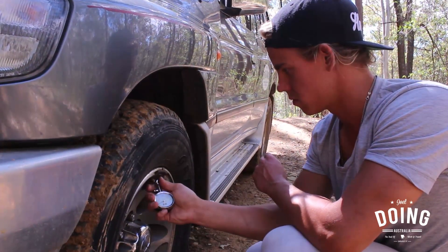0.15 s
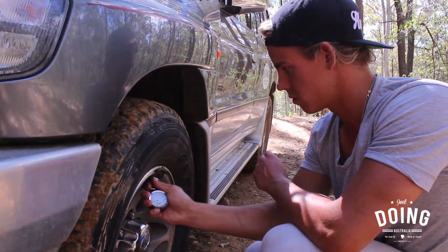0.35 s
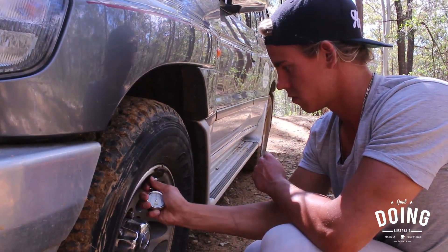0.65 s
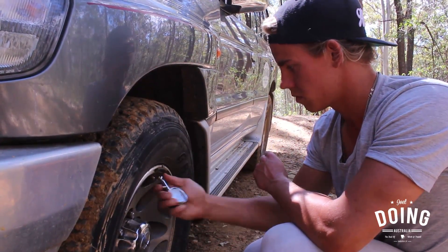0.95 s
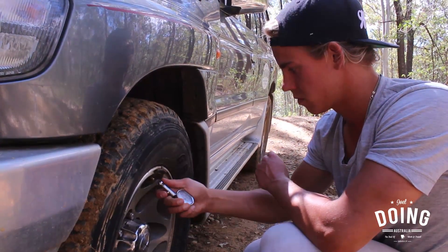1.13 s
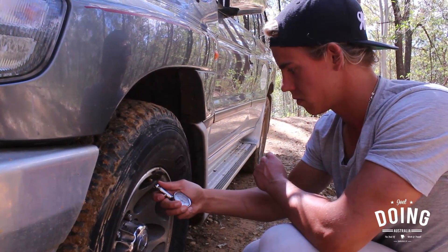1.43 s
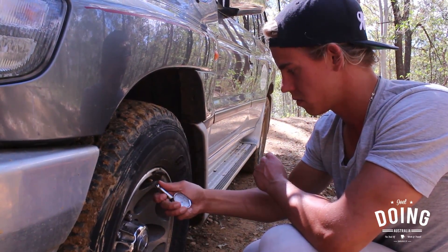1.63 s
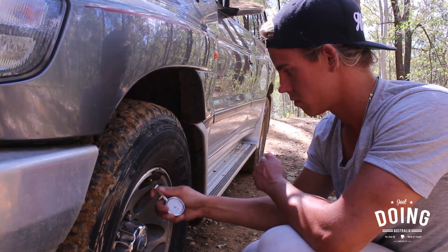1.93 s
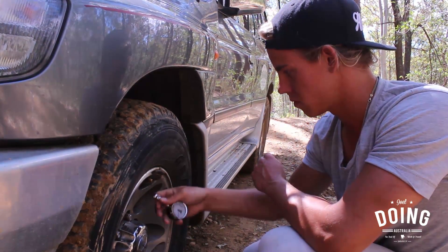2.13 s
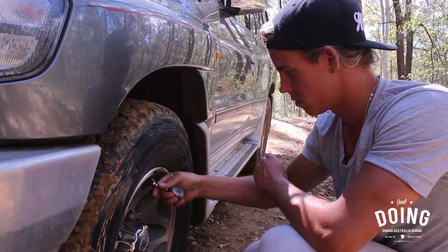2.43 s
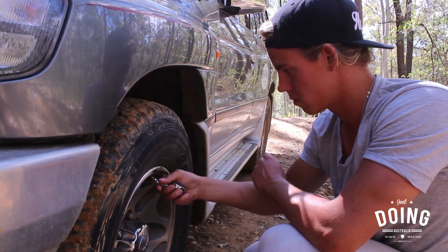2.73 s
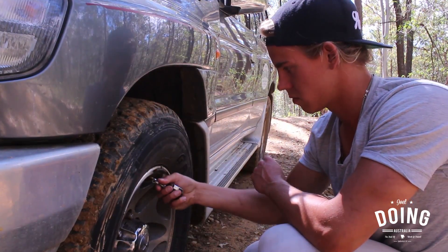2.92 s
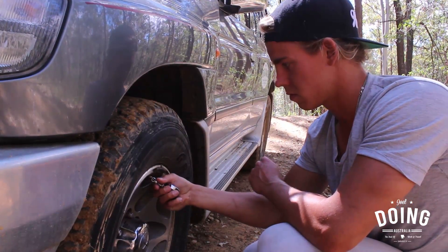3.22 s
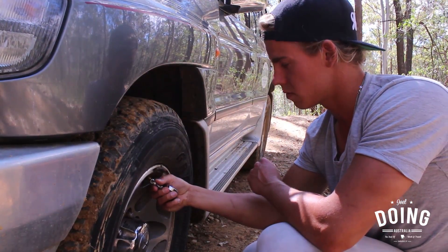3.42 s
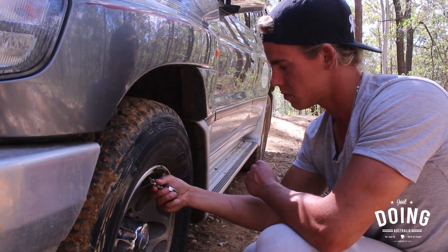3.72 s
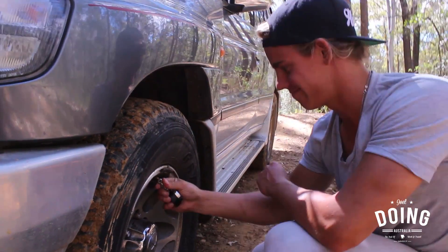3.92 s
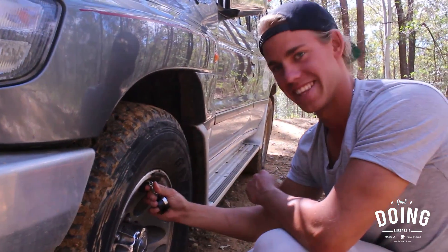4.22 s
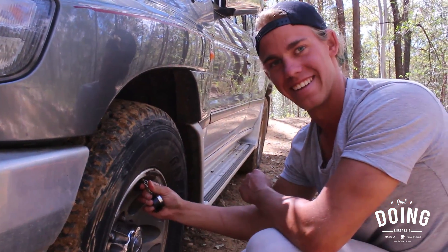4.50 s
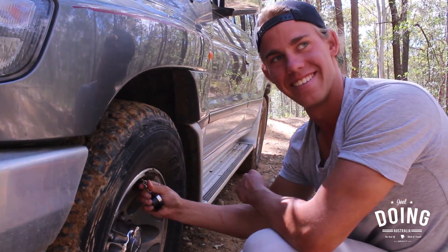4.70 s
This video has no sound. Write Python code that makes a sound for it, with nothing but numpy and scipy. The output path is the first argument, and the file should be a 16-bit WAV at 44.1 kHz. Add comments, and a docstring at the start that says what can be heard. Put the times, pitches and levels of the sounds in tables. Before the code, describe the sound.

Outdoors, very quiet at first: light clusters of metallic clicks, dull little knocks and a couple of brief air spurts from a tyre valve, with thin far bird whistles. Shortly before three seconds the valve opens and air hisses strongly and continuously to the end, with one sudden break and quick fade back in a changed tone. Close, dry, centred sound with faint background hiss.

```python
"""Outdoors in a quiet wood, a tyre valve close to the microphone, a light breeze over it throughout.
First a small pressure gauge ticks and fumbles against the valve (gritty contacts ringing its modes), with
dull low knocks and short puffs of escaping air (swelling noise); far birds call (gliding sines).
Then the pin is held down and the jet hisses: noise blown through resonances of gauge and wheel.
Late on the sound breaks off and fades back in, and the hiss has another colour."""
import sys
import numpy as np
from scipy import signal
from scipy.fft import rfft, irfft
from scipy.io import wavfile
from scipy.ndimage import map_coordinates

SR = 44100
rng = np.random.default_rng(int(sys.argv[2]) if len(sys.argv) > 2 else 0)


def put_to_file(sound):
    """Save the sound as 16-bit audio at rate SR, in the file named by the first command-line argument."""
    columns = np.atleast_2d(sound).T  # one column per channel
    safe = np.clip(columns, -1, 1)
    whole_steps = np.round(safe * 32767)
    wavfile.write(sys.argv[1], SR, whole_steps.astype(np.int16))


def invert_db(level):
    """Linear amplitude ratio for a level in decibels (20 dB per decade), elementwise."""
    return 10 ** (np.asarray(level, dtype=float) / 20)


N = 214087   # samples


def rms_one(x):
    """Scale to rms 1."""
    return x / np.sqrt(np.mean(x ** 2) + 1e-30)


def in_time(rows):
    """Columns of a table at every sample, straight lines between its times."""
    s, *columns = np.transpose(rows)
    return [np.interp(np.arange(N) / SR, s, c) for c in columns]


def coloured(spectrum, white):
    """Filter noise by a curve of gains in dB, drawn over log frequency."""
    hz, db = np.transpose(spectrum)
    grid_hz = np.arange(N // 2 + 1) * SR / N + 1   # 1 Hz up, so that the log exists
    gain_db = np.interp(np.log(grid_hz), np.log(hz), db)
    return irfft(rfft(white) * invert_db(gain_db), N)


def drift(rate_hz):
    """Slow chance of spread 1: noise through two equal low-pass poles, drawn at every 40th sample."""
    r = np.exp(-80 * np.pi * rate_hz / SR)
    white = rng.standard_normal(N // 40 + 2002)
    slow = signal.lfilter([1], [1, -2 * r, r * r], white)[2000:]   # leave out the settling
    return np.interp(np.arange(N) / 40, np.arange(len(slow)), rms_one(slow))


def ramp(start_s, rise_s):
    """0 before the start, rising straight to 1."""
    return np.clip((np.arange(N) / SR - start_s) / max(rise_s, 1 / SR), 0, 1)


def resonance(x, hz, width_hz):
    """Two-pole peak passed twice for steep flanks, gain 1 on top."""
    r = np.exp(-np.pi * width_hz / np.sqrt(np.sqrt(2) - 1) / SR)
    peak = [(1 - r * r) / 2, 0, (r * r - 1) / 2, 1, -2 * r * np.cos(2 * np.pi * hz / SR), r * r]
    return signal.sosfilt([peak, peak], x)


def ring(x, hz, t60_s):
    """A unit click sets a dying sine of starting height 1 ringing."""
    r = invert_db(-60 / (t60_s * SR))
    w = 2 * np.pi * hz / SR
    return signal.lfilter([0, np.sin(w)], [1, -2 * r * np.cos(w), r * r], x + 1e-18)


def breeze(lumps_db=1.0):
    """Low lumpy noise of air over the microphone."""
    # strength of the breeze: start_s, rms_db
    strength = [(0, -64.5), (.6, -67), (1.3, -69), (2.2, -74), (2.72, -65.5), (2.88, -72.5), (3.05, -63.5),
                (3.6, -72), (4.1, -62), (4.3, -63), (4.45, -70.5), (4.86, -69.5)]
    # its spectrum: pitch_hz, level_db (per Hz)
    breeze_colour = [(8.8, -36), (15, 3.5), (55, 2), (225, -18.5), (300, -17.5), (390, -55), (660, -120)]
    noise = rms_one(coloured(breeze_colour, rng.standard_normal(N)))
    return invert_db(in_time(strength)[0] + lumps_db * drift(10.5)) * noise


def wood(level_db=-72.5, sway_db=0.45):
    """Far rustle and murmur of the trees: steady coloured noise that sways a little."""
    # spectrum of the far trees: pitch_hz, level_db (per Hz)
    murmur = [(60, -16.5), (100, 0), (160, -3.5), (224, -6.5), (600, -8.5), (1450, -13), (2430, -22),
              (8000, -31), (16000, -62)]
    return invert_db(level_db + sway_db * drift(2.1)) * rms_one(coloured(murmur, rng.standard_normal(N)))


def touches(count=7, spread_db=6.5, faint_treble_db=-21):
    """The ticks, and a few faint touches scattered at random over each fumble."""
    # gauge against valve: start_s, level_db, treble_db (per octave)
    clear = [(0.1363, -42.5, -4), (0.194, -57, -5), (0.2067, -52, -1), (0.2242, -45.5, -10),
             (0.261, -52, -14), (0.277, -40.5, -17), (0.2849, -43, 3.5), (0.295, -49, -10),
             (0.867, -33.5, 15.5), (0.8997, -40.5, 4), (0.917, -39, -1), (0.923, -44, -3),
             (0.9336, -41, -3), (0.939, -44, 4), (1.6283, -52, 16), (2.135, -63, -7), (2.485, -39, -3),
             (2.8878, -35, -4)]
    # fumbling between the ticks: start_s, length_s, level_db (of the strongest touch possible)
    fumbles = [(0.184, 0.028, -60), (0.273, 0.038, -50), (0.916, 0.028, -51.5)]
    faint = []
    for s, length_s, db in fumbles:
        for when, less in rng.random((count, 2)):
            faint.append((s + length_s * when, db - 2 * spread_db * less, faint_treble_db))
    return np.transpose(clear + faint)


def ticks(contact_s=0.003, spread_db=2.5, crack_db=-16):
    """A short gritty contact cracks and rings every mode by chance strengths; some touches ring brighter."""
    # modes of the gauge: pitch_hz, level_db, t60_s
    modes = [(1545, -18, 0.055), (2040, -15.5, 0.017), (3100, -2, 0.01), (3490, 0.5, 0.0063),
             (3750, -2, 0.01), (3950, -7, .014), (5180, -6, 0.011), (6210, -5.5, 0.007),
             (7600, -11, 0.0027), (9720, -11, 0.0047)]
    s, db, treble_db = touches()   # each touch has its own treble tilt
    at = np.round(s * SR).astype(int)
    contact = np.exp(-np.arange(900) / (contact_s * SR))
    luck = rng.standard_normal((len(at), len(modes)))

    def gritty(level_db):
        """Noise that dies away after each touch."""
        blows = np.zeros(N)
        blows[at] = invert_db(level_db)
        return signal.fftconvolve(blows, contact)[:N] * rng.standard_normal(N)

    out = resonance(gritty(db + crack_db + treble_db), 7300, 6800)
    for k, (hz, mode_db, t60_s) in enumerate(modes):
        octaves = np.log2(max(hz, 3500) / 3500)   # the treble tilt starts at 3500 Hz
        mode_level_db = db + mode_db - 24.5 + treble_db * octaves + spread_db * luck[:, k]
        out += ring(gritty(mode_level_db), hz, t60_s)
    return out


def wheel_arch(x, sway_s=.000025):
    """Close echoes comb the sound; the comb slides as the hand moves."""
    # echoes off wing, sill and ground: delay_s, level_db
    echoes = [(.00085, -21.5), (.0023, -24), (.0061, -20), (0.0125, -18)]
    n = np.arange(N)
    out = x
    for delay_s, db in echoes:
        place = n - SR * (delay_s + sway_s * drift(0.97))
        out = out + invert_db(db) * map_coordinates(x, [place], order=3)
    return out


def trees(x, t60_s):
    """Scattering among the trunks: a smooth dying tail of noise, one second long."""
    tail = rng.standard_normal(SR) * invert_db(-60 * np.arange(SR) / SR / t60_s)
    return signal.fftconvolve(x, tail / np.sqrt(np.sum(tail ** 2)))[:N]


def bumps(cycles=5.0):
    """Soft low knocks: a rounded push that rings a few cycles."""
    # dull knocks: start_s, level_db, pitch_hz
    knocks = [(.137, -60, 334), (0.298, -60, 318), (0.668, -56, 89), (2.888, -55.5, 525),
              (4.146, -52.5, 120), (4.167, -50, 69)]
    out = 0
    for s, db, hz in knocks:
        click = np.zeros(N)
        click[round(s * SR)] = -invert_db(db)
        push = ring(click, hz, 3 / hz) * hz / SR * 12
        out = out + ring(push, hz, cycles / hz)
    return out


def puffs(hold_share=0.77):
    """Each leak swells, holds for a share of its rise, then dies; a tight gap sounds brighter."""
    # short leaks: open_s (fully open), rms_db, rise_s, t60_s, brightness (0-1)
    short_leaks = [(0.441, -41.5, 0.027, 0.067, 0.2), (.8665, -34, 0.0074, 0.045, 0.03),
                   (0.93, -64, 0.016, 0.025, 0.3), (1.61, -51.5, 0.0054, 0.073, 1),
                   (1.628, -54, .0015, 0.014, 0.95), (1.64, -69, .012, .08, 0.1)]
    # spectra of a dull and a bright leak: pitch_hz, level_db (per Hz)
    dull_colour = [(300, -26), (1270, -17), (1570, -10), (2150, -14.5), (2950, 0.5), (4240, 3), (5910, -3),
                   (7330, -30), (9000, -4), (10300, -20), (14000, -27), (15800, -17)]
    bright_colour = [(300, -11), (3600, -10), (5500, -3.5), (9000, -7), (13000, -2.5), (15800, -7)]
    t, out = np.arange(N) / SR, 0
    dull = rms_one(coloured(dull_colour, rng.standard_normal(N)))
    bright = rms_one(coloured(bright_colour, rng.standard_normal(N)))
    for s, db, rise_s, t60_s, share in short_leaks:
        dying_s = np.maximum(t - s - hold_share * rise_s, 0)
        shape = ramp(s - rise_s, rise_s) ** 2 * invert_db(db - 60 * dying_s / t60_s)
        share = np.clip(share, 0, 1)
        out = out + shape * (np.sqrt(1 - share) * dull + np.sqrt(share) * bright)
    return out


def birds(waver_db=5.5, glide_s=.028, edge_s=.012, fade_db_per_s=18):
    """Far birds: near sines that glide to a settled pitch, fade and flutter on the way."""
    # notes of a low whistler and a high chirper:
    # start_s, length_s, first_hz, settled_hz, rms_db (before fading), hoarseness (share of pitch)
    notes = [(.625, .25, 2370, 2308, -74, .003), (2.108, .024, 2520, 2510, -78, .004),
             (2.135, .33, 2330, 2305, -80.5, .003), (.818, .2, 7300, 5050, -82.5, .012),
             (2.352, .14, 7200, 5130, -81, .011)]
    t, out = np.arange(N) / SR, 0
    for s, length_s, first_hz, settled_hz, db, hoarse in notes:
        age_s = np.maximum(t - s, 0)
        glide_hz = settled_hz + (first_hz - settled_hz) * np.exp(-age_s / glide_s)
        hz = glide_hz * (1 + hoarse * drift(120))
        shape = ramp(s, edge_s) * (1 - ramp(s + length_s - edge_s, edge_s))
        flutter_db = waver_db * np.tanh(1.5 * drift(70))
        gain = shape * invert_db(db - fade_db_per_s * age_s + flutter_db)
        out = out + np.sqrt(2) * gain * np.sin(2 * np.pi * np.cumsum(hz) / SR)
    return out


def sliding(x, share):
    """Read at a slowly wandering speed, so that every pitch slides by about this share."""
    place = np.cumsum(1 + share * drift(1.5))
    return map_coordinates(x, [place], order=3, mode="mirror")


def jet(wander_db_per_khz=.17, flutter_db=.25, gust_db=.8, slide_per_khz=.0007):
    """Turbulent noise, partly through resonances that wax, wane and slide, high ones most, as the hand shifts."""
    # the valve opens unevenly, then stays at full flow: start_s, rms_db
    opening = [(2.752, -85), (2.781, -70), (2.787, -60), (2.84, -51), (2.89, -47.5), (2.903, -52.5),
               (2.972, -47), (3.004, -41.5), (3.06, -40)]
    # grips on the valve pin: start_s, blend_s, level_db (against full flow)
    grips = [(2.75, .001, 1.5), (2.925, .085, 1), (3.921, 0.0011, -0.4)]
    # broad colour of the jet, a list for each grip: pitch_hz, level_db (per Hz)
    jet_colours = [
        [(180, -49), (300, -26), (988, -10), (2050, -3.5), (5180, -7.5), (8510, 0), (15700, -1)],
        [(150, -56), (250, -32), (520, -16.5), (700, -21), (900, -16.5), (1300, -15.5), (1550, -3.5),
         (1900, -9), (2230, -30), (2700, -8), (3300, -7), (5000, -13), (8200, -10.5), (11500, -12),
         (15800, -14.5)],
        [(150, -50), (250, -24.5), (520, -7.5), (700, -12.5), (1000, -8.5), (1300, -14.5), (1800, -5),
         (2950, -6.5), (3700, -1), (4900, -6), (7000, -0.5), (10500, -1.5), (12500, 1), (15800, -7)],
    ]
    # resonances of gauge and wheel, a list for each grip:
    # pitch_hz, width_hz, then level_db at even steps from the first to the last moment of the grip
    jet_peaks = [
        [(7270, 450, 9, -28), (10240, 170, 1, -3), (12340, 500, -3, -1), (1960, 190, -22, -1)],
        [(1955, 158, 4.5, 3), (2427, 114, -1, -1.5), (3290, 94, -5, -9), (3508, 144, -3.5, 1.5),
         (3890, 54, -2, -5.5), (4154, 235, -4, -2), (4695, 300, -18, -8), (5666, 410, -14, -5.5),
         (6580, 270, -15, -5), (8070, 720, -11.5, -4), (9000, 83, -4, -4), (9470, 450, -8, -8),
         (10810, 360, -4, -13), (12330, 350, -5, -13), (13460, 140, -9, -7), (15100, 410, -7, -22)],
        [(1890, 930, -7.5, -9, -7), (3465, 250, -3, -13, -15), (3990, 310, -5, -8.5, -10),
         (5750, 200, -12, -6, -9), (6510, 120, -4, 3.5, 0), (6940, 400, -7, -5, -5.5),
         (8580, 490, -8, -1, -2.5), (7700, 200, -12, -7, -7), (9100, 99, -3, -2, -2),
         (11830, 180, -3, -2.5, -6), (12280, 240, -8, -2, 0), (12900, 280, -22, 0, -4),
         (10850, 250, 0, -9, -12), (15300, 280, -5, -8, -17)],
    ]
    # broad noise against the resonances: level_db for each grip
    between_db = [-7.5, 0, -5]
    out = 0
    taken = [ramp(s, blend_s) for s, blend_s, db in grips] + [np.zeros(N)]
    ends_s = [s + blend_s for s, blend_s, db in grips[1:]] + [N / SR]
    flow = invert_db(in_time(opening)[0])
    for g, (start_s, blend_s, grip_db) in enumerate(grips):
        white = rng.standard_normal((3, N))
        hiss = invert_db(between_db[g]) * coloured(jet_colours[g], white[2])
        for k, (hz, width_hz, *steps_db) in enumerate(jet_peaks[g]):
            khz = hz / 1000
            steps_s = np.linspace(start_s, ends_s[g], len(steps_db))
            db, = in_time(list(zip(steps_s, steps_db)))
            # peaks take turns at two noises
            blown = sliding(resonance(white[k % 2], hz, width_hz), slide_per_khz * khz)
            db = db + wander_db_per_khz * khz * drift(2.4) + gust_db * drift(25)
            hiss += invert_db(db) * blown
        # the powers of two grips add up to one while they blend
        held = np.sqrt(np.maximum(taken[g] ** 2 - taken[g + 1] ** 2, 0))
        gain = flow * invert_db(grip_db) * held
        hiss_rms = np.sqrt(np.sum((gain * hiss) ** 2) / np.sum(gain ** 2))
        out = out + gain * invert_db(flutter_db * drift(2.8)) * hiss / hiss_rms
    return out


def scene():
    """Everything reaches both channels alike; once the sound breaks off and fades back in."""
    break_s, return_s, return_curve = 3.9205, 0.045, 1.42
    gauge, leaks, calls = ticks(), puffs(), birds()
    midrange = resonance(gauge + leaks, 4400, 2200)   # the part of the valve sounds that the trees return
    far = invert_db(-2) * trees(calls, t60_s=1.2) + invert_db(-26) * trees(midrange, t60_s=.55)
    heard = wheel_arch(jet() + gauge) + leaks + calls + far + bumps() + breeze() + wood()
    heard = heard * (1 - ramp(break_s, 0) + ramp(break_s, return_s) ** return_curve)
    return np.stack([heard, heard])


def top_cut(x):
    """Nothing passes above the cut-off."""
    return signal.sosfilt(signal.butter(12, 16790, fs=SR, output="sos"), x)


def record(dry):
    """Each channel of the microphone adds its own electronic hiss; the top is cut sharply."""
    hiss_db, cutoff_hz = -74, 15790
    # spectrum of the electronic hiss: pitch_hz, level_db (per Hz)
    self_noise = [(50, 8.5), (500, -3), (3000, -4.5), (16000, -5)]
    hiss = [rms_one(coloured(self_noise, rng.standard_normal(N))) for channel in dry]
    passed = np.arange(N // 2 + 1) * SR / N < cutoff_hz
    mix = irfft(rfft(dry + invert_db(hiss_db) * np.array(hiss)) * passed, N)
    return top_cut(mix)


dry = scene()
out = record(dry)
put_to_file(out)
```